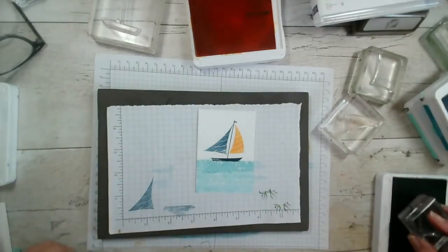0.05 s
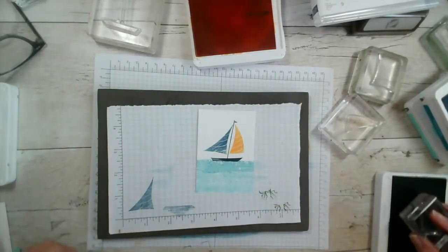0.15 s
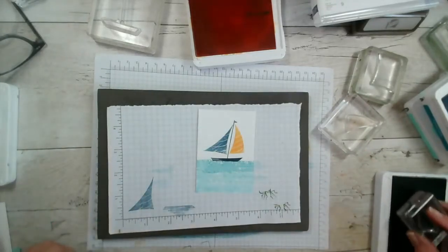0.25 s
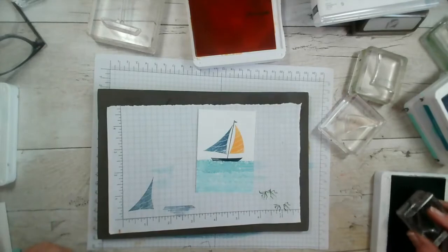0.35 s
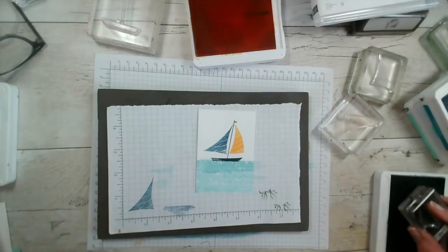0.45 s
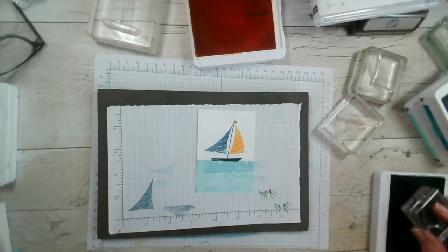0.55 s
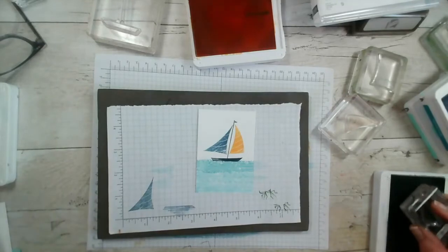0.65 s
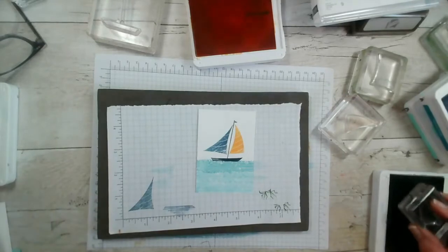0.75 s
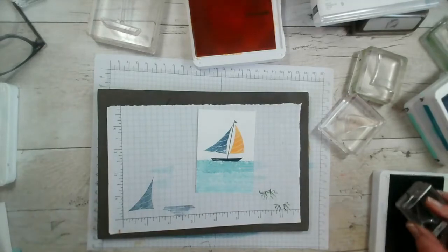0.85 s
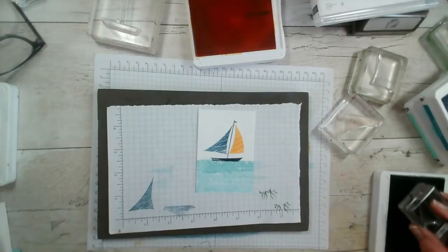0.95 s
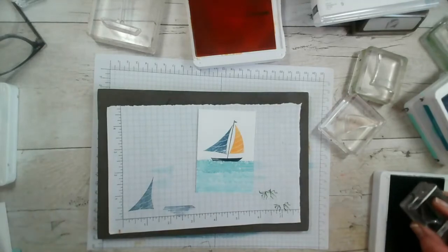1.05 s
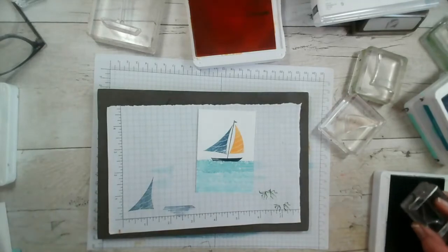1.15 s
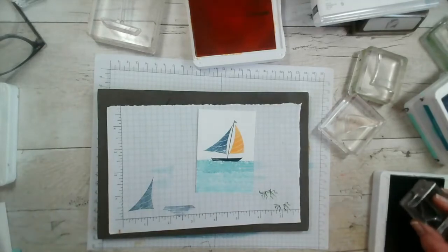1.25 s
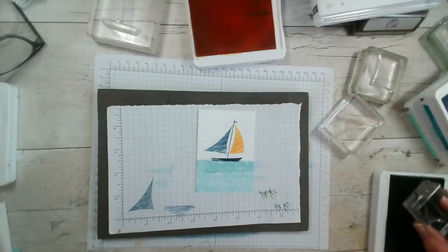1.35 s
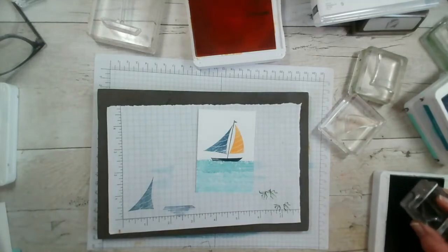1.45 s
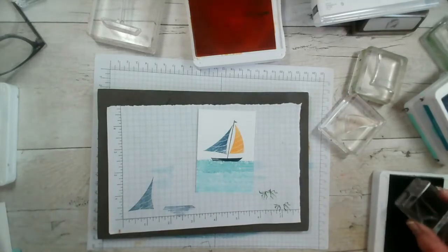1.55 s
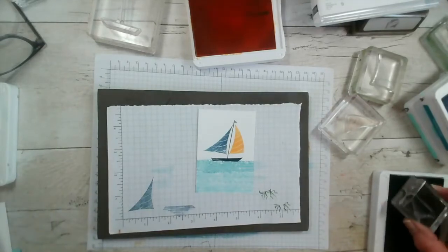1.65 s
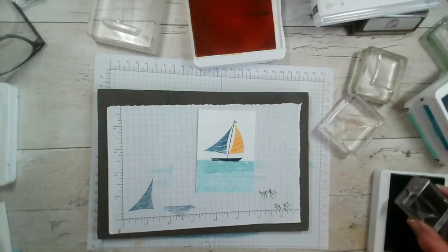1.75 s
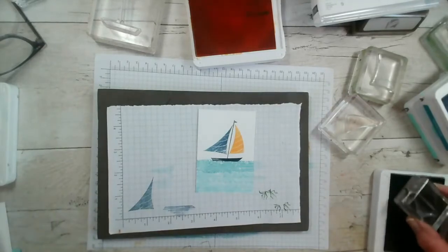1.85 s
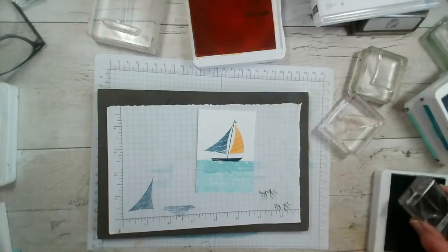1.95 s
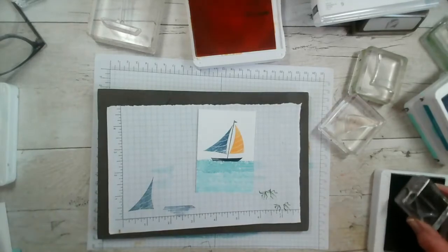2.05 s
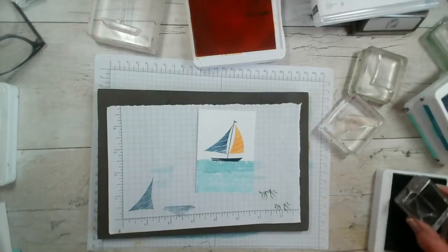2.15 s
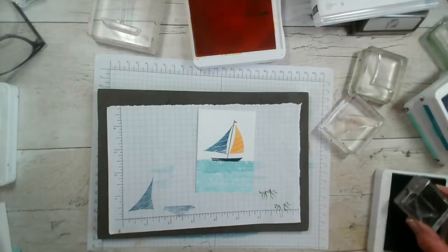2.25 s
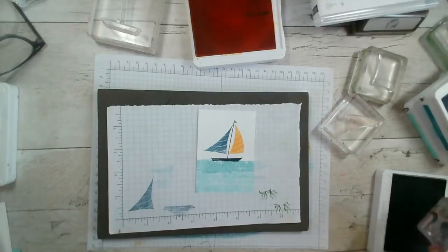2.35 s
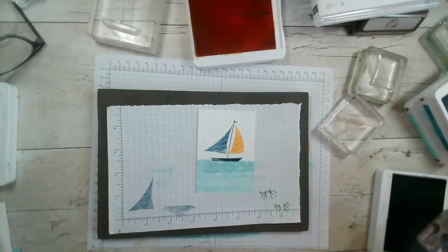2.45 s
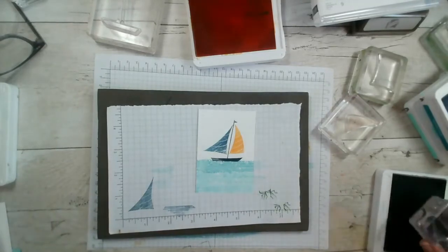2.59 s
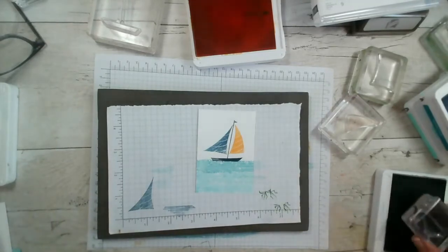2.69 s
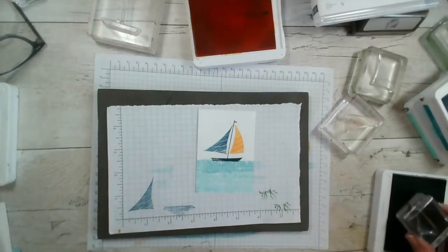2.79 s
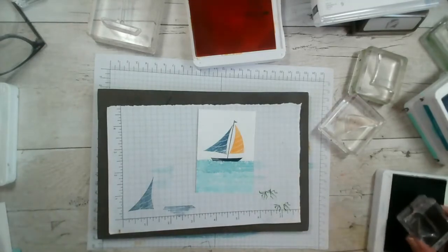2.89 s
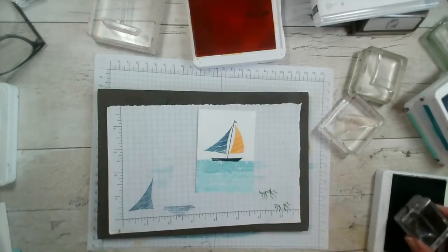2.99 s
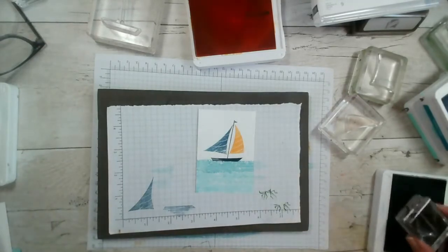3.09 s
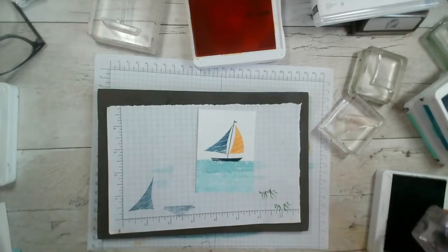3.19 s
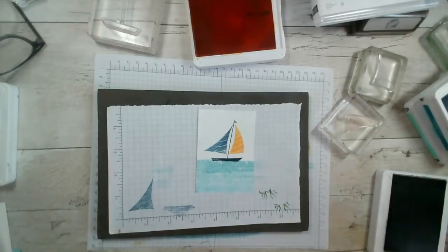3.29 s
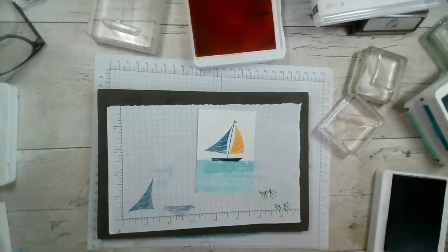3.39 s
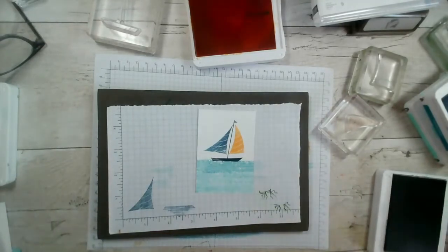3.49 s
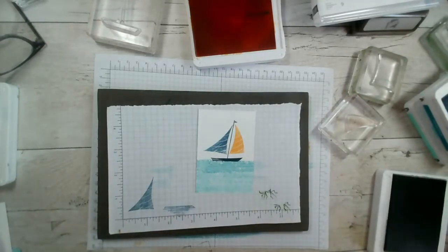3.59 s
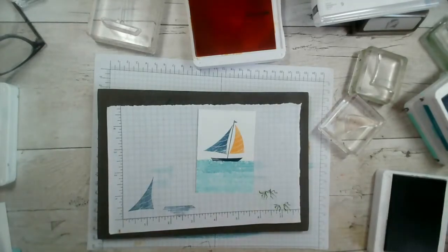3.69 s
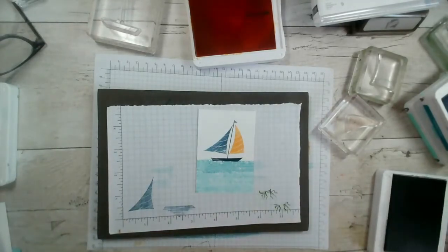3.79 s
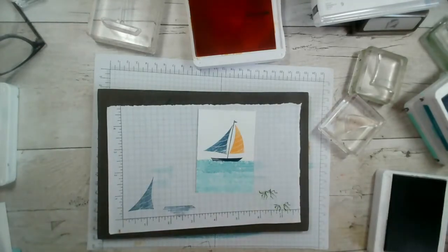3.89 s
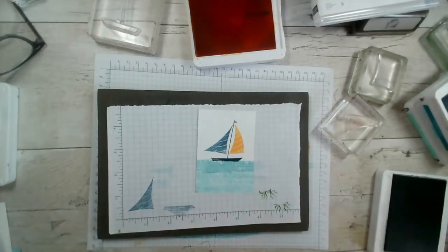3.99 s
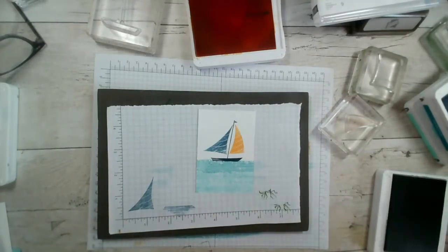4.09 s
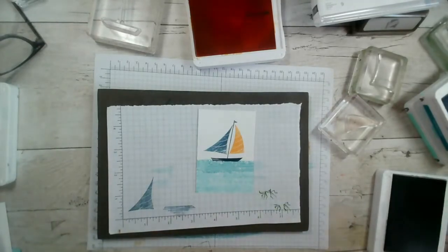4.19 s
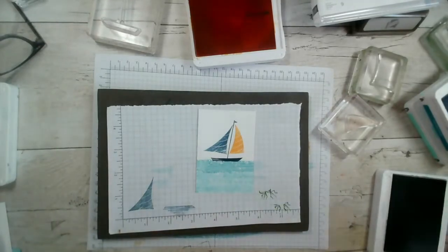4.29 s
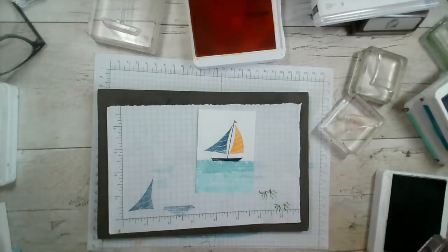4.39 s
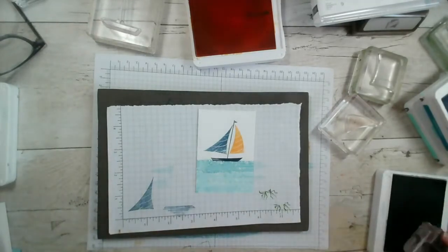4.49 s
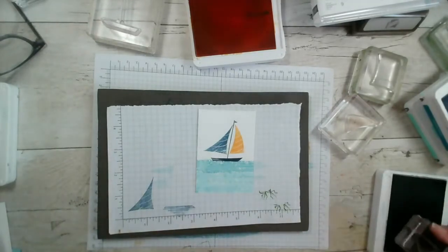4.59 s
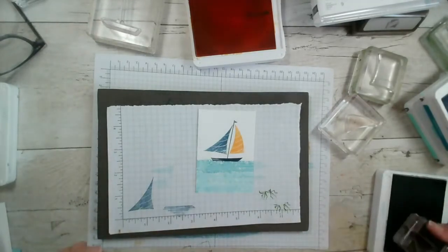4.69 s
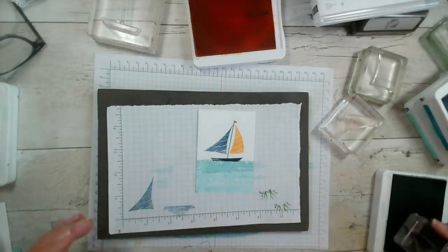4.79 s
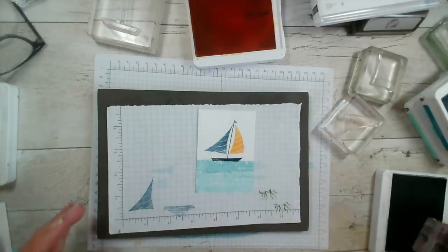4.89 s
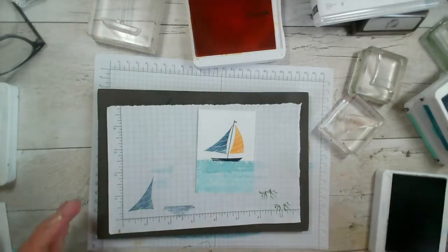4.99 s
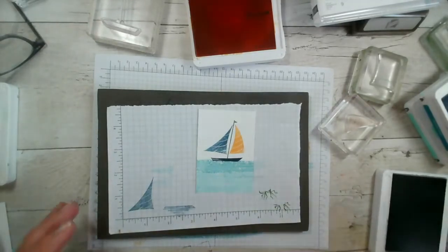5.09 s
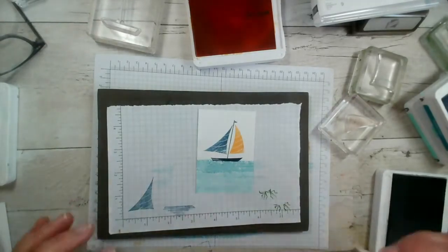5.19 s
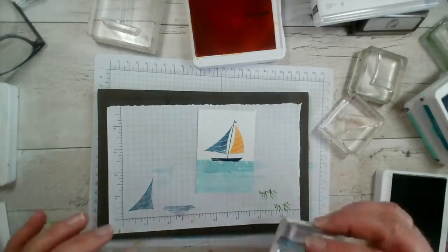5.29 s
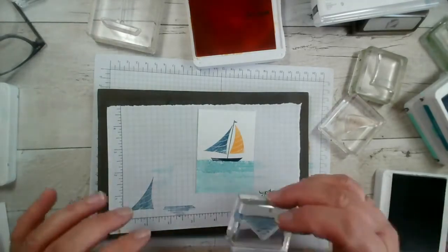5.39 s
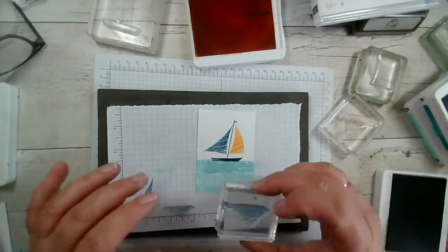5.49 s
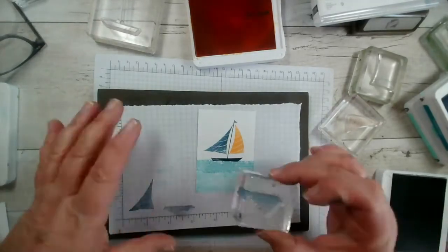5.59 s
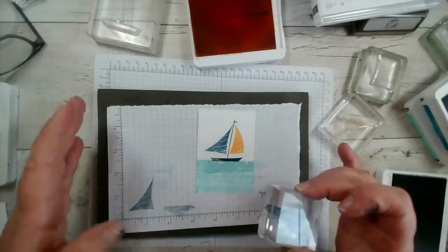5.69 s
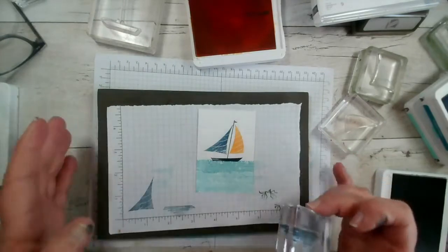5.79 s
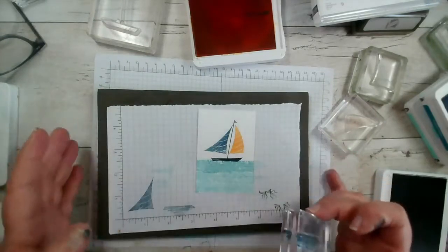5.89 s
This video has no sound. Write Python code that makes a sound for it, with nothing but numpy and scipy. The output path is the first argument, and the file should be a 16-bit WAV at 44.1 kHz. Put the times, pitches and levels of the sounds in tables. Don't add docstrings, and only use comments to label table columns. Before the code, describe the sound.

In a small quiet room, a hard plastic block dabs a foam ink pad about five times a second, each dab a low table thump with a light rattle of the case. After two seconds the dabbing thins out, pauses, then a press and one hard knock with bounces land near five seconds. The microphone stands on the same table, so thuds are boomy; faint hiss and motor hum lie behind.

```python
import sys
import numpy as np
from scipy import signal
from scipy.io import wavfile
from scipy.ndimage import uniform_filter1d

SR = 44100
rng = np.random.default_rng(int(sys.argv[2]) if len(sys.argv) > 2 else 0)


def rack_gain(trim_db):
    fader = np.asarray(trim_db, float)
    return 10 ** (fader / 20)


def unload_audio(sound):
    columns = np.transpose(np.atleast_2d(sound))
    steps = np.round(np.clip(columns, -1, 1) * 32767)
    wavfile.write(sys.argv[1], SR, steps.astype(np.int16))


N = 262130

# [f/Hz, level/dB per Hz]
AIR_NOISE = [(20, -17.5), (45, -10.5), (70, -22.5), (110, -5), (150, -17.5), (230, -25.5), (500, -17),
             (1100, -24), (1750, -28), (1950, -28.5), (3700, -30.5), (5000, -38.5), (9000, -51.5),
             (16000, -57)]
# [f/Hz, width/Hz, level/dB]
AIR_RESONANCES = [(520.8, 8.5, 14.5), (1382, 220, 7), (1640, 170, 10), (2965, 420, 5), (3500, 174, 5.5)]
# [f/Hz, t60/s]
ROOM_DECAY = [(200, .2), (600, .13), (2000, .1), (12000, .06)]
# [t/s, firing rate f/Hz, first order level/dB, second order level/dB]
ENGINE_RUN = [(0, 62.3, -79, -89), (2.3, 61.55, -77, -74), (2.7, 75, -98, -67.5), (3.1, 83, -79, -62),
              (3.6, 92.04, -72, -76.5), (4.2, 109.8, -71, -76), (4.4, 113.4, -60, -94),
              (4.7, 120.8, -62, -91), (5, 120.6, -68, -109), (5.94, 112.9, -72, -74.5)]
# [multiple of shaft rate, level/dB]
MOTOR_ORDERS = [(1, -73.5), (2, -69), (3, -80.5), (4, -83.5)]
# [f/Hz, level/dB]
MOTOR_LINES = [(1000, -95.5), (1684, -83), (2000, -97.5), (10000, -102)]
# [start t/s, length/s, level/dB]
LEANS = [(-.1, 0.97, -53.5), (.85, 1.7, -60), (3.38, 0.21, -55), (4.3, 0.823, -58.5), (5.76, 0.37, -61.5)]
# [start t/s, length/s, level/dB]
SLIDES = [(5.3, 0.44, -73)]
# [start t/s, length/s, level/dB]
SLEEVE_RUBS = [(.68, 0.28, -81), (1.35, 0.26, -80.5), (1.75, 0.23, -82.5), (2.48, 0.26, -80.5),
               (3.2, 0.27, -84)]
# [start t/s, length/s, level/dB]
SLEEVE_SWEEPS = [(3.02, .1, -80), (5.08, .55, -85), (5.88, .2, -82)]
# [f/Hz, level/dB]
SOFT_CLOTH = [(1000, -51), (2500, -10), (3800, 0), (5000, -6.5), (7000, -13.5), (10000, -17), (16000, -25)]
# [f/Hz, level/dB]
CRISP_CLOTH = [(2500, -38), (5000, -4), (8000, -5.5), (12000, -10), (16000, -12.5)]
# [f/Hz, level/dB, t60/s]
BLOCK_MODES = [(1500, 0, .004), (2500, 0, .003), (3500, -2, .003), (4600, -4, .003), (5700, -4, .003),
               (7700, -3, .003), (9500, -7, .003)]
# [f/Hz, level/dB, t60/s]
CASE_MODES = [(736, -5.5, 0.026), (850, -5, 0.012), (939, -2, 0.034), (1066, -10, 0.013), (1310, -7, 0.012),
              (1555, -10.5, 0.017)]
# [f/Hz, level/dB, t60/s]
TOP_MODES = [(102.6, -2, 0.03), (145, -12.5, 0.042), (169.3, -6.5, 0.16), (187.4, -8.5, 0.13),
             (248, -3.5, 0.034)]
# [f/Hz, level/dB, t60/s]
LEG_MODES = [(37.3, -23.5, 0.24), (60.3, -4, 0.17), (83, -24, 0.81), (244, -23, 0.13)]
# [f/Hz, level/dB, t60/s]
EDGE_MODES = [(64, 0, 0.12), (83, -18.5, 0.93), (104.5, -4.5, 0.085), (122.1, -15, 1)]
# [f/Hz, level/dB, t60/s]
BOARD_MODES = [(271, 2.5, 0.14), (305, 7, 0.11), (357.2, 0.5, 0.12), (422.6, -1, 0.05),
               (459.2, -3.5, 0.091), (521.6, 3, 0.045), (587, 1.5, 0.035), (662, -17.5, 0.097)]
# [f/Hz, level/dB, t60/s]
FAR_BOARD_MODES = [(303.9, 5.9, 0.097)]
# [t/s, peak level/dB, tilt/dB per octave]
EDGE_TICKS = [(.41, -52, -2), (1.339, -55, -3), (1.348, -56, 4), (2.094, -60, 8), (2.247, -51, -3),
              (2.2586, -51, 6), (2.2655, -48, -4), (3.142, -53, -5), (4.6174, -52, -7), (4.846, -56, -10),
              (4.853, -58, -10), (4.8640, -39, 1), (4.8662, -46, -3)]
# [t/s, thump peak level/dB, table sway/dB, airborne pat/dB, board ring/dB]
FOAM_DABS = [(0.0755, -24, 3.5, -27, 1.5), (0.2393, -23.5, 3.5, -30, 2), (0.4371, -19, 1, -32, 3.5),
             (0.6542, -19, 0.5, -30.5, 1), (0.8638, -23.5, 3, -33, 1.5), (1.0564, -23.5, 1.5, -48, -4),
             (1.2435, -16.5, -2, -37.5, 2), (1.4644, -19.5, -0.5, -32, 0), (1.6632, -23.5, 3.5, -44, -1.5),
             (1.827, -24.5, 2.5, -50, 1.5), (2.005, -19, 1, -43, -0.5), (2.1707, -18, 0, -40, -1),
             (2.7175, -29, 6, -27.5, -18), (3.0029, -21, 1.5, -36, -6.5)]
# [t/s, thump level/dB, contact/ms, sway/dB, board ring/dB]
CASE_DROPS = [(0.16, -58, 0.56, -4, -4), (0.347, -53, 0.5, -6, 1), (0.416, -43, 0.76, 4, 14),
              (0.5453, -45, 1, -3, -5), (0.7625, -52, 0.74, -15, 22), (0.967, -36, 0.79, 2, 6.5),
              (1.154, -36, 0.9, 8.5, 6), (1.3332, -34, 0.74, -8, -10), (1.3418, -38, 0.42, 15, 16),
              (1.3764, -50, 0.9, -4, -7), (1.57, -36.5, 1, 8, 11.5), (1.762, -36, 0.68, 10, -6),
              (1.922, -38, 0.64, 7, 2), (2.1042, -34, 1, -7, 10.5), (2.885, -36, 1, -4, -10),
              (3.1489, -33, 0.87, 1.5, 3), (3.1743, -41, 0.97, 23, 9), (5.9327, -45, 0.97, 17, -3)]
# [t/s, thump level/dB, contact/ms, pat/dB, board ring/dB]
CASE_KNOCKS = [
    (1.3555, -28.5, 1, -12.5, 12.5),
    (2.2675, -23.5, 0.99, -12, 12.5),
    (2.2779, -37, 0.34, -51, 10),
    (4.869, -21, 0.89, -8.5, 8.5),
    (4.878, -32.5, 0.97, -30, 18.5),
    (4.8823, -24.5, 0.6, -39, 4.5),
]
# [t/s, thump level/dB, contact/ms, pat/dB, board ring/dB]
EDGE_PRESSES = [
    (4.6241, -20, 1.48, -30.5, 6.5),
    (4.636, -32.5, 0.44, -42, -20),
]

HISS_DB, ROOM_DB = -65, -12
MOTOR_HZ = 95.4
MOTOR_HOLD_DB, MOTOR_HOLD_S, MOTOR_SINK_DB_PER_S = 0.2, 3.66, 4.1
LEAN_REST_DB, LEAN_EASE_S = -65.5, 0.1
SLIDE_REST_DB, SLIDE_EASE_S = -78.5, 0.0836
RUB_REST_DB, SWEEP_REST_DB, SLEEVE_EASE_S = -84, -85, 0.073
TICK_MS, TICK_MS_PER_TILT_DB = 0.012, 0.006
CUSHION, CUSHION_MS, CUSHION_LEAD_MS = 0.15, 1.55, 4.75
UNLOAD_S, UNLOAD_EASE_S, UNLOAD_DB = 0.068, 0.022, -7
BOARD_RISE_MS, BOARD_TRAVEL_MS = 1.6, 7.68
FAR_RISE_MS, FAR_TRAVEL_MS = 8, 15.33
DAB_MS, DAB_MS_PER_SWAY_DB, DAB_MS_PER_DB, USUAL_DAB_DB = 1.163, 0.16, 0.05, -20.5
LIFT_PAT_DB, LIFT_PAT_PER_DB, USUAL_LIFT_DB = -24, 0.5, -42
KNOCK_SWAY_DB, EDGE_SWAY_DB = -9.5, -6.5
TOUCH_MS = dict(dab=8.5, lift=6.5, knock=4.22, edge=6.5)
PUSH_CENTRE_S = 1 / 50


def evened(x):
    return x / np.sqrt(np.mean(x ** 2) + 1e-20)


def read(points, hz):
    f, value = np.transpose(points)
    return np.interp(np.log(hz + 1), np.log(f + 1), value)


def track(rows):
    s, *columns = np.transpose(rows)
    return [np.interp(np.arange(N) / SR, s, c) for c in columns]


def add(mix, s, sound):
    part = mix[round(s * SR):][:len(sound)]
    part += sound[:len(part)]


def wander(rate):
    low_pass = signal.butter(2, rate, fs=SR, output="sos")
    return evened(signal.sosfilt(low_pass, rng.standard_normal(N)))


def noise(db, patchy_db, size=1024):
    frames, hz = 4 * N // size + 5, np.fft.rfftfreq(size, 1 / SR)
    real, imaginary, patches = rng.standard_normal((frames, len(hz), 3)).T
    patches = uniform_filter1d(patches, size=12, axis=0)
    patches = evened(uniform_filter1d(patches, size=10, axis=1))
    z = (real + 1j * imaginary) * rack_gain(db(hz)[:, None] + patchy_db * patches)
    return evened(signal.istft(z, nperseg=size, noverlap=3 * size // 4)[1][:N])


def ring(modes):
    t = np.arange(SR // 2) / SR
    return sum(rack_gain(db - 60 * t / t60) * np.cos(2 * np.pi * hz * t) for hz, db, t60 in modes)


def push(ms, at_ms=0):
    t_ms = (np.arange(SR // 25) / SR - PUSH_CENTRE_S) * 1000
    bell = np.exp(-(t_ms - at_ms) ** 2 / (2 * ms ** 2))
    return bell / bell.sum()


def strokes(rows, rest_db, ease_s):
    t = np.arange(N) / SR
    gain = rack_gain(rest_db)
    for s, length, db in rows:
        ease = np.clip(np.minimum(t - s, s + length - t) / ease_s, 0, 1)
        gain = gain + rack_gain(db) * np.sin(np.pi / 2 * ease) ** 2
    return gain


def hiss():
    def colour(hz):
        peaks = sum(db / (1 + (2 * (hz - f) / width) ** 2) for f, width, db in AIR_RESONANCES)
        return read(AIR_NOISE, hz) + peaks
    return rack_gain(HISS_DB) * noise(colour, patchy_db=1.45, size=2048)


def room(x):
    taps, at = np.zeros(SR // 2), np.arange(200, SR // 2 - 20, 20)
    taps[at + rng.integers(0, 20, len(at))] = rng.choice([-1., 1.], len(at))
    hz, t, z = signal.stft(taps, SR, nperseg=256)
    decay = rack_gain(-60 * t / read(ROOM_DECAY, hz)[:, None])
    tail = signal.istft(z * decay, SR, nperseg=256)[1]
    return signal.fftconvolve(x, tail / np.linalg.norm(tail))[:N]


def engine():
    hz, first_db, second_db = track(ENGINE_RUN)
    turns = 2 * np.pi * np.cumsum(hz * (1 + 0.013 * wander(7.5))) / SR
    orders = rack_gain(first_db) * np.sin(turns) + rack_gain(second_db) * np.sin(2 * turns)
    return np.sqrt(2) * rack_gain(0.84 * wander(2.5)) * orders


def motor():
    t = np.arange(N) / SR
    turns = np.cumsum(MOTOR_HZ * (1 + 0.0052 * wander(4.3))) / SR
    hum = sum(rack_gain(db + 1.5 * wander(23.0)) * np.sin(2 * np.pi * (k * turns + rng.random()))
              for k, db in MOTOR_ORDERS)
    fade = rack_gain(MOTOR_HOLD_DB - MOTOR_SINK_DB_PER_S * np.maximum(t - MOTOR_HOLD_S, 0))
    whine = sum(rack_gain(db) * np.sin(2 * np.pi * hz * t) for hz, db in MOTOR_LINES)
    return np.sqrt(2) * (fade * hum + whine)


def stirred(rate, modes):
    force = np.diff(wander(rate), prepend=0)
    return evened(signal.fftconvolve(force, ring(modes))[:N])


def lean():
    sway = stirred(60.0, [(50.5, -18.5, 0.033), (26, -12, 0.15)])
    murmur = stirred(220.0, [(223.3, -0.98, 0.16), (302, -1.1, 0.12)])
    leaning = strokes(LEANS, LEAN_REST_DB, LEAN_EASE_S) * sway
    return leaning + strokes(SLIDES, SLIDE_REST_DB, SLIDE_EASE_S) * murmur


def sleeve():
    soft = noise(lambda hz: read(SOFT_CLOTH, hz), patchy_db=2.0, size=512)
    crisp = noise(lambda hz: read(CRISP_CLOTH, hz), patchy_db=2.0, size=512)
    rubs = strokes(SLEEVE_RUBS, RUB_REST_DB, SLEEVE_EASE_S) * soft
    return rubs + strokes(SLEEVE_SWEEPS, SWEEP_REST_DB, SLEEVE_EASE_S) * crisp


def crackle(share, length, decay_s):
    luck = rng.standard_normal(length)
    return np.append(-1, share * luck * np.exp(-np.arange(length) / (decay_s * SR)))


def ticks():
    out = np.zeros(N)
    for s, db, tilt_db in EDGE_TICKS:
        modes = [(hz, d + tilt_db * np.log2(hz / 4000), t60) for hz, d, t60 in BLOCK_MODES]
        block = np.convolve(ring(modes)[:1000], np.hanning(7))
        tick = np.convolve(crackle(0.25, 100, 0.0006), block)
        contact_ms = max(TICK_MS - TICK_MS_PER_TILT_DB * tilt_db, 0.005)
        tick = signal.fftconvolve(tick, push(contact_ms))
        add(out, s - PUSH_CENTRE_S, rack_gain(db) * tick / abs(tick).max())
    return out


def swelling(modes, travel_ms, rise_ms):
    hz, db, t60 = np.transpose(modes)[:, :, None]
    t = np.maximum(np.arange(SR // 2) / SR - travel_ms(hz) / 1000, 0)
    rise = 1 - np.exp(-t * 1000 / rise_ms)
    return (rack_gain(db - 60 * t / t60) * np.sin(2 * np.pi * hz * t) * rise).sum(0)


def board_ring():
    near = swelling(BOARD_MODES, lambda hz: BOARD_TRAVEL_MS * np.sqrt(300 / hz), BOARD_RISE_MS)
    return near + swelling(FAR_BOARD_MODES, lambda hz: FAR_TRAVEL_MS, FAR_RISE_MS)


def contacts():
    dabs = []
    for s, db, sway_db, pat_db, board_db in FOAM_DABS:
        ms = DAB_MS + DAB_MS_PER_SWAY_DB * sway_db + DAB_MS_PER_DB * (db - USUAL_DAB_DB)
        dabs.append((s, db, ms, sway_db, pat_db, board_db))
    lifts = []
    for s, db, ms, sway_db, board_db in CASE_DROPS:
        pat_db = LIFT_PAT_DB + LIFT_PAT_PER_DB * (db - USUAL_LIFT_DB)
        lifts.append((s, db, ms, sway_db, pat_db, board_db))
    knocks = [(s, db, ms, KNOCK_SWAY_DB, pat_db, board_db) for s, db, ms, pat_db, board_db in CASE_KNOCKS]
    edge = [(s, db, ms, EDGE_SWAY_DB, pat_db, board_db) for s, db, ms, pat_db, board_db in EDGE_PRESSES]
    return dict(dab=dabs, lift=lifts, knock=knocks, edge=edge)


def blows(rows, legs, touch_ms, damped_db):
    table, air = np.zeros(N), np.zeros(N)
    sway, top, case, board = ring(legs), ring(TOP_MODES), ring(CASE_MODES), board_ring()
    unloaded = np.clip((np.arange(len(sway)) / SR - UNLOAD_S) / UNLOAD_EASE_S, 0, 1)
    sway = sway * rack_gain(damped_db * unloaded)
    for s, db, ms, sway_db, air_db, board_db in rows:
        start = s - PUSH_CENTRE_S
        force = push(max(ms, 0.1)) - CUSHION * push(CUSHION_MS, -CUSHION_LEAD_MS)
        thump = signal.fftconvolve(force, top + rack_gain(sway_db) * sway)
        dip = signal.fftconvolve(push(max(0.066 * ms, 0.1), -14.5), board)
        board_part = rack_gain(board_db - 23) * dip / dip.max()
        add(table, start, rack_gain(db) * (thump / thump.max() - board_part))
        shake = np.convolve(crackle(0.13, 300, 0.0018), push(max(0.13 * ms, 0.02)))
        pat = signal.fftconvolve(shake, case)
        add(air, start - touch_ms / 1000, rack_gain(db + air_db) * pat / abs(pat).max())
    return np.array([table, air])


def scene():
    paths = np.zeros((2, N))
    for kind, rows in contacts().items():
        legs, damped_db = (EDGE_MODES, 0) if kind == "edge" else (LEG_MODES, UNLOAD_DB)
        paths += blows(rows, legs, TOUCH_MS[kind], damped_db)
    table, air = paths
    air = air + ticks()
    steady = hiss() + motor() + engine() + lean() + sleeve()
    reverberation = rack_gain(ROOM_DB) * room(air + 0.31 * table)
    return (table + air + reverberation + steady)[None]


def top_cut(x):
    return signal.sosfilt(signal.butter(12, 15610, fs=SR, output="sos"), x)


def record(dry):
    bass_cut = signal.butter(2, 38.3, "high", fs=SR, output="sos")
    mix = signal.sosfilt(bass_cut, dry)
    return top_cut(mix)


dry = scene()
out = record(dry)
unload_audio(out)
```